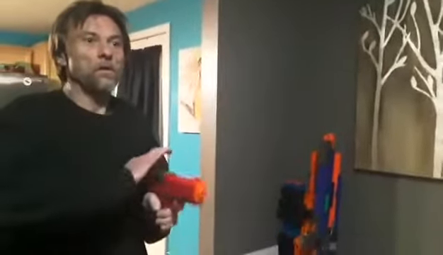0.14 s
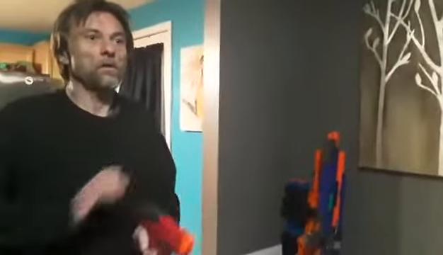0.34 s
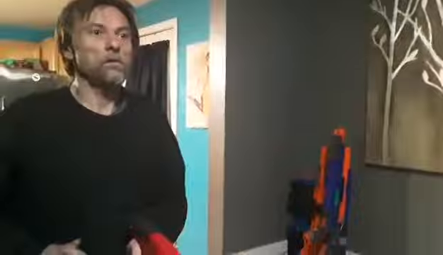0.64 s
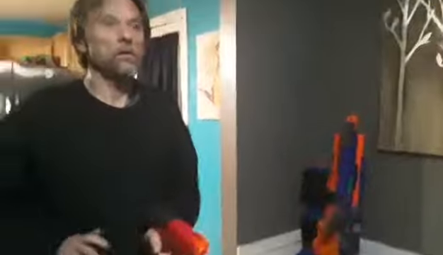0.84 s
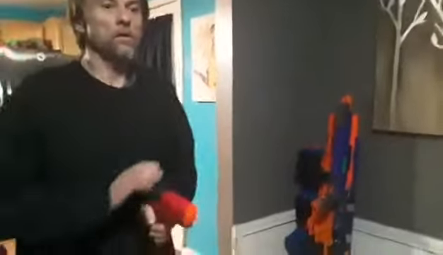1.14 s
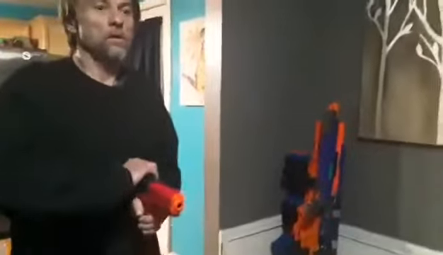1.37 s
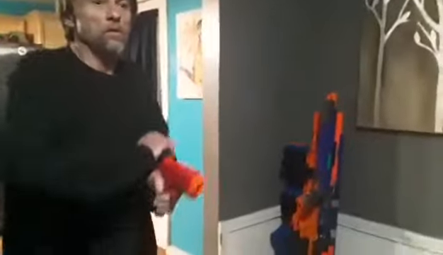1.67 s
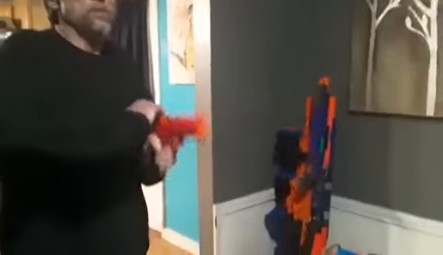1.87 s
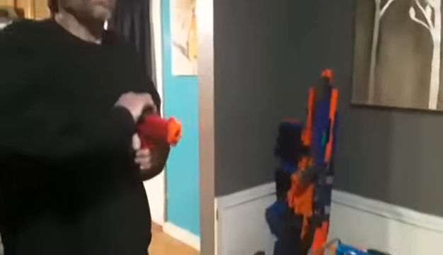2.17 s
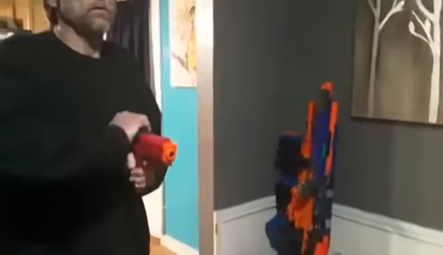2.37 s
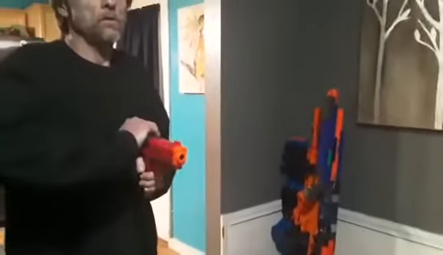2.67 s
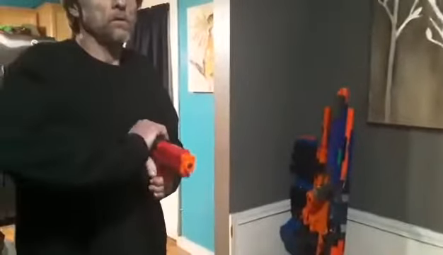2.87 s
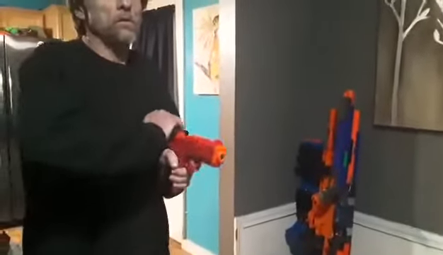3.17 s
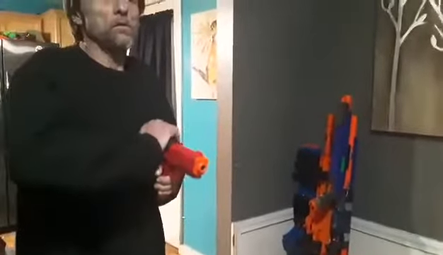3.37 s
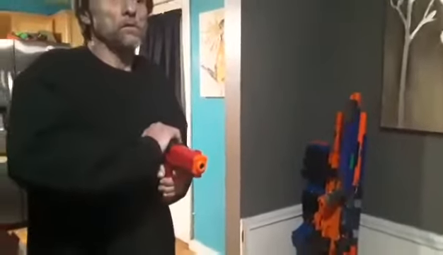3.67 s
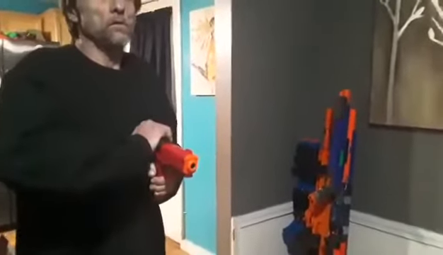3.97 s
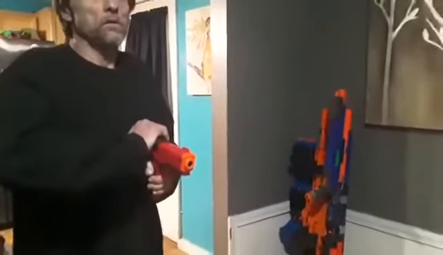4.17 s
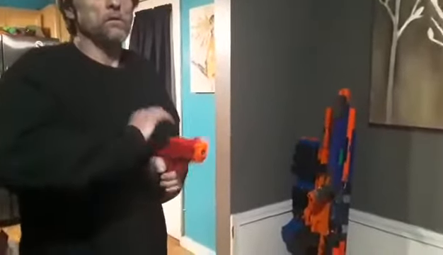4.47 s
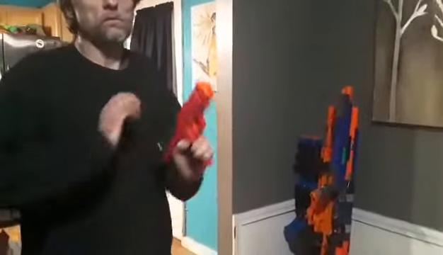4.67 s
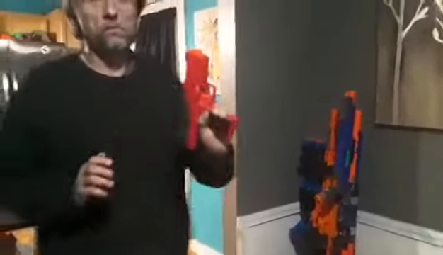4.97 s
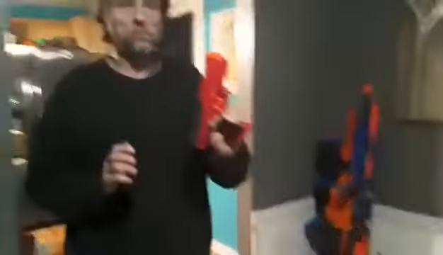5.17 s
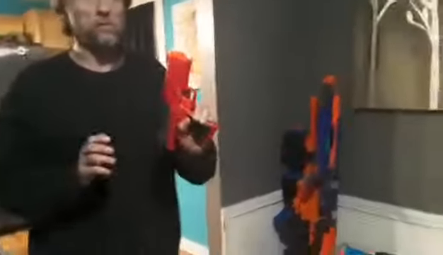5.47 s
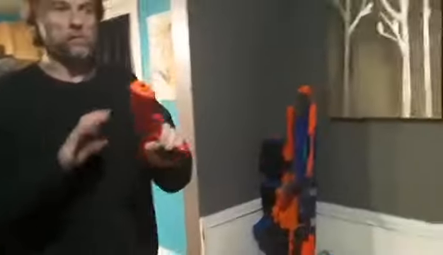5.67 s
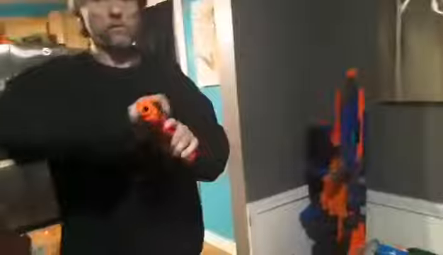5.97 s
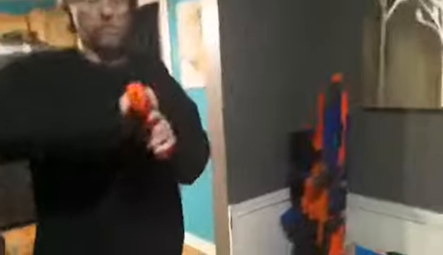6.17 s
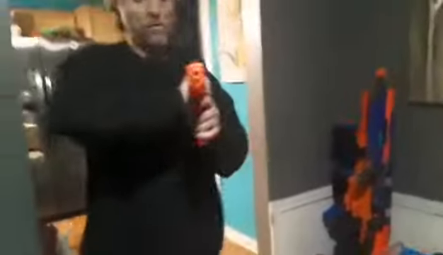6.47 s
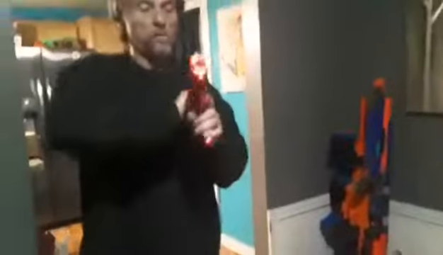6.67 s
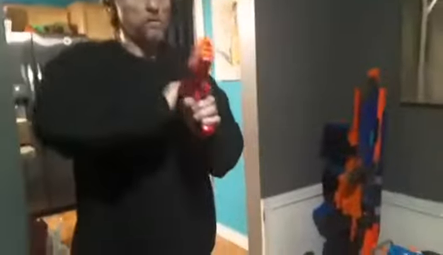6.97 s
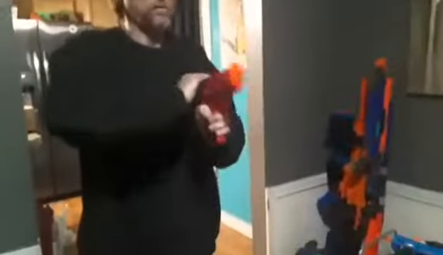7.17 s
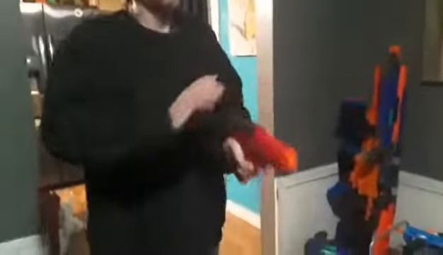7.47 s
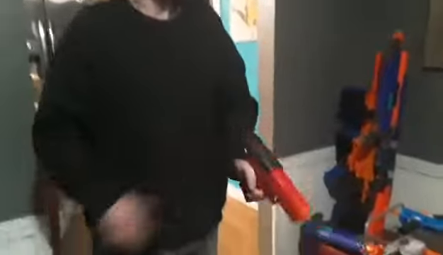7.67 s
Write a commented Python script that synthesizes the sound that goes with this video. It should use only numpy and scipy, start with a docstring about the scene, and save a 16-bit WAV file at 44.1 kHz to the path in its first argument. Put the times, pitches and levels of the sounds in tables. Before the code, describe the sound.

A spring-powered plastic dart pistol snaps and pops three times close to the microphone, its slide scraping and latching between shots. Two darts hit a hollow surface across the small room, the second with a loud slap. Later come a few dull bumps and faint ticks on the microphone and a final crisp pull and slam of the slide. A quiet low hum sinks after each shot and returns.

```python
"""A small, hard-walled room, heard through a camera's two closely spaced microphones.
Nearby, a spring-driven foam dart pistol is primed and fired three times: the plastic slide scrapes and
latches, and each shot pops, hoots in the barrel and rattles the spring. Two darts thud across the room.
Right at the microphones, small knocks and faint crackles come through the camera's own case.
Behind it all, a low hum sinks after each shot and comes back."""
import sys
import numpy as np
from scipy import signal
from scipy.fft import rfft, irfft
from scipy.io import wavfile
from scipy.ndimage import uniform_filter1d

SR = 44100
rng = np.random.default_rng(int(sys.argv[2]) if len(sys.argv) > 2 else 0)


def file_out(sig):
    """Save sig as 16-bit WAV at sys.argv[1]."""
    # one column per channel
    cols = np.atleast_2d(sig).T
    # limit, then scale
    lim = np.clip(cols, -1, 1)
    pcm = np.round(lim * 32767).astype(np.int16)
    wavfile.write(sys.argv[1], SR, pcm)


N = 344862


# The pistol's body under a shot. Each row: frequency in Hz, relative level in dB.
PISTOL_BODY = [(20, -32.5), (40, -21.5), (120, -2), (260, 2.5), (500, 1), (1000, -3), (1500, -0.5),
               (2550, -3.5), (4400, -4.5), (7000, -4), (9200, -4), (11000, -11), (12200, -26.5)]
# The barrel's odd quarter waves, a few rings of the spring, and the dips between them.
# Each row: frequency in Hz, width in Hz, height against the body in dB.
BARREL_RINGS = [(710.6, 40, 21.5), (766, 91, 13), (1290, 50, 8), (2126, 77, 17), (2220, 130, 14),
                (3040, 140, 13), (3470, 100, 14.5), (3700, 120, 14), (5000, 320, 14.5), (6000, 34, 6),
                (6430, 81, 8.5), (2430, 61, -7), (4235, 53, -6.5), (4820, 280, -5.5), (5300, 260, -7.5),
                (6700, 240, -9.5)]
# Shots near the microphones. Each row: start in seconds, level in dB, air pop strength in dB,
# pop decay in seconds, rebound delay in seconds, rebound against the slam in dB, tilt in dB per octave.
SHOTS = [(0.6114, -12, -8, 0.0011, 0.072, -7.5, 1.1), (2.3681, -13, -5, 0.0015, 0.056, 2.5, 1),
         (3.6796, -11.5, -7, 0.00068, 0.025, -2.5, 0.14)]

def shot(db, pop_db, pop_s, rebound_s, rebound_db, tilt_db, size=8192):
    """The plunger rushes forward and slams home, sounding the barrel; the spring chatters and rebounds."""
    t = np.arange(size) / SR
    since_slam = t - 0.0064
    rush = amp(-7) * (since_slam < 0) * np.minimum(t / 0.0016, 1)
    slam = burst(since_slam, 0.02)
    chatter = amp(-4) * (since_slam > 0) * np.exp(-np.maximum(t - rebound_s, 0) / 0.007)
    rebound = amp(rebound_db) * np.exp(-((t - rebound_s) / 0.009) ** 2)
    envelope = np.sqrt(rush ** 2 + slam ** 2 + chatter ** 2 + rebound ** 2)
    force = casing_echoes(whiten(envelope * rng.standard_normal(size)), echo_db=-7)
    sound = amp(db) * room(resonate(force, PISTOL_BODY, tilt_db, BARREL_RINGS), direct_db=-1.5)
    # the air behind the dart leaves the muzzle as one low pulse
    age = np.maximum(t - 0.0073, 0) / pop_s
    pulse = (age > 0) * (age - 1) * np.exp(-age)
    pop = signal.sosfilt(signal.butter(2, [45, 900], "bandpass", fs=SR, output="sos"), pulse)
    add(sound, 0, amp(pop_db - 3) * room(pop, direct_db=8, side_db=-5))
    return sound


# The slide drawn back. Each row: start, catch and latch in seconds, catch level in dB,
# latch level in dB, how squarely the pistol faces the microphones from 0 to 1.
PULLS = [(1.587, 1.6764, 1.825, -30.5, -32, 0), (2.882, 2.9944, 3.159, -32, -40.5, 0.05),
         (6.3, 6.409, 6.571, -13, -19, 0.83)]
START_DIRECT_DB = -7  # the click that opens a stroke is heard mostly off the walls

def pull(start, catch, latch, db, latch_db, facing, sear_s=0.033):
    """The slide breaks free, rubs back, rides over the sear and catches; then the latch snaps."""
    # facing the microphones, the pistol is brighter, more direct and louder on the right
    brighter, direct_db, side_db = 1.95 * facing, 5.5 * facing, -17 * facing
    rub_tilt, click_tilt = brighter - 0.46, brighter + 1
    sear = catch - sear_s
    return [(start, clack(db - 13, click_tilt, START_DIRECT_DB + direct_db, side_db)),
            (start, rub(sear - start, db - 24.5, db - 24.5, rub_tilt)),
            (sear, clack(db - 6.5, rub_tilt, START_DIRECT_DB + direct_db, side_db)),
            (sear, rub(sear_s, db - 20, db - 20, rub_tilt)),
            *hard_stop(catch, db, rub_tilt, direct_db=2.5, side_db=0.4 * side_db),
            (latch, clack(latch_db, click_tilt + brighter, direct_db, side_db))]


# The slide pushed home. Each row: start and stop in seconds, levels of first click, rub and stop in dB,
# tilt in dB per octave, directness in dB, left over right in dB.
PUSHES = [(0.008, 0.0534, -22, -21.5, -9, 0.7, 2, 1.5), (1.923, 1.956, -43.5, -28, -12.5, 0, 1.5, 2),
          (3.25, 3.284, -30, -39.5, -31.5, -0.5, 6, 4), (7.152, 7.196, -14.5, -18.5, -12.5, 0.5, 4.5, -4)]

def push(start, stop, click_db, rub_db, stop_db, tilt_db, direct_db, side_db, ridge_s=0.017):
    """The slide clicks loose, rubs louder as it gathers speed, bumps over a ridge and slams home."""
    click_tilt, rub_tilt = tilt_db + 3.3, tilt_db + 1.2
    return [(start, clack(click_db, click_tilt, START_DIRECT_DB, side_db)),
            (start, rub(stop - start, rub_db - 10.5, rub_db, rub_tilt)),
            (start + ridge_s, clack(rub_db - 0.5, click_tilt, direct_db, side_db)),
            *hard_stop(stop, stop_db, tilt_db, direct_db, side_db)]


def hard_stop(start, db, tilt_db, direct_db, side_db, bounce_s=0.0045):
    """The slide hits a stop, bounces once and sets the spring singing."""
    return [(start, clack(db, tilt_db, direct_db, side_db)),
            (start + bounce_s, clack(db - 3, tilt_db, direct_db, side_db)),
            (start, spring_twang(db - 41))]


def spring_twang(db, hz=4200, spread_hz=225, t60=1.05, size=32768):
    """A cluster of close coil modes that outlasts the room."""
    t = np.arange(size) / SR
    modes_hz = hz + spread_hz * rng.standard_normal((2, 14, 1))
    coils = np.sin(2 * np.pi * (modes_hz * t + rng.random((2, 14, 1)))).sum(1)
    return amp(db - 60 * t / t60) * unit_rms(coils) * np.minimum(t / 0.004, 1)


# The pistol's plastic shell. Each row: frequency in Hz, relative level in dB.
SHELL = [(88, -43), (150, -20), (350, -5), (385, -5.5), (664, -10), (832, 0), (949, -5), (1080, -1.5),
         (1580, -3.5), (1700, -3.5), (4120, -4.5), (5790, -9.5), (6240, -12), (11800, -18), (13500, -27.5)]

def clack(db, tilt_db, direct_db, side_db, size=1024):
    """One hard contact rings the shell, and the loose parts rattle briefly."""
    t = np.arange(size) / SR
    rattle = rng.standard_normal(size) * (rng.random(size) < 700 / SR) * burst(t, 0.011)
    contact = rng.standard_normal(size) * burst(t, 0.0028)
    force = casing_echoes(contact + amp(4) * rattle, echo_db=-2.5)
    sound = room(resonate(force, SHELL, tilt_db), direct_db - 6, side_db)
    # the edge of the catch sends a bright snap straight to the microphones
    snap = np.diff(rng.standard_normal((2, size + 1))) * burst(t - 0.0004, 0.0006)
    add(sound, 0, amp(direct_db + tilt_db - 8) * pan(side_db) * snap)
    return amp(db) * sound


def rub(length, first_db, last_db, tilt_db, slips_per_s=1500, size=16384):
    """Plastic sticks and slips on plastic: dense small clicks into the shell."""
    t = np.arange(size) / SR
    slips = rng.uniform(-1, 1, size) * (rng.random(size) < slips_per_s / SR)
    grain = unit_rms(unit_rms(slips) + 0.5 * rng.standard_normal(size))
    envelope = amp(np.interp(t, [0, length], [first_db, last_db])) * np.minimum(t / 0.004, 1)
    force = casing_echoes(grain * envelope * (t < length), echo_db=-5)
    return room(resonate(force, SHELL, tilt_db), direct_db=-2.5, side_db=-3.5)


def casing_echoes(force, echo_db, size=256):
    """Quick echoes inside the pistol comb the treble, differently each time."""
    echoes = rng.standard_normal(size) * burst(np.arange(size) / SR, 0.0016)
    echoes = highpass(echoes, hz=4000)
    taps = np.r_[1, amp(echo_db) * echoes / np.linalg.norm(echoes)]
    return signal.fftconvolve(force, taps / np.linalg.norm(taps))


# The slide starting to move. Each row: start and length in seconds, pitch in Hz, level in dB.
SQUEAKS = [(6.302, 0.034, 1330, -41), (7.14, 0.0082, 1160, -45.5)]

def squeak(length, hz, db, size=4096):
    """For a moment the slips fall into step and give a rough tone."""
    t = np.arange(size) / SR
    waver = unit_rms(uniform_filter1d(rng.standard_normal(size), 60))
    tone = np.sin(2 * np.pi * np.cumsum(hz * (1 + 0.026 * waver)) / SR)
    return room(amp(db) * tone * np.sin(np.pi * np.minimum(t / length, 1)), direct_db=6)


# A hand on the pistol. Each row: start and end in seconds, final level in dB.
GRIPS = [(0.456, 0.636, -53.5), (2.201, 2.348, -50), (5.098, 5.147, -55.5), (6.017, 6.133, -58),
         (7.002, 7.101, -53.5)]

def grip(length, db):
    """The shell creaks louder as the grip tightens."""
    return rub(length, db - 13.5, db, tilt_db=-0.8)


# Handling, just right of centre. Each row: start in seconds, level in dB, tilt in dB per octave,
# directness in dB.
LOOSE_CLICKS = [(0.908, -41, -1, 1), (1.174, -49, -1.5, -1), (2.115, -30, -5, 0), (3.632, -44, 0, 0.5),
                (7.508, -46.5, 4.5, 4.5)]

def loose_click(db, tilt_db, direct_db):
    """A loose part clicks against the shell."""
    return clack(db, tilt_db, direct_db, side_db=-2.5)


# The panel the darts hit. Each row: frequency in Hz, relative level in dB.
PANEL = [(20, -34), (50, -26), (110, -11), (260, 7), (420, 5), (750, 2.5), (1150, 0.5), (1700, -6.5),
         (4000, -7.5), (7000, -18.5), (10000, -27.5), (13000, -49)]
# Its resonances. Each row: frequency in Hz, width in Hz, height in dB before a dart's offset.
PANEL_RINGS = [(268, 24, 11), (378, 35, 11), (590, 86, 12.5), (4470, 1300, 2)]
# Darts landing across the room, heard mostly off the walls. Each row: start in seconds,
# slap level in dB, tilt in dB per octave, resonance offset in dB, thud level in dB.
DARTS = [(2.622, -25.5, 0, -9.5, -14), (3.8805, -7.5, 1.5, -2.5, -18)]

def dart(db, tilt_db, ring_db, thud_db, size=4096):
    """A foam dart strikes a hollow panel: a slap that rings it, and a dull thud."""
    t = np.arange(size) / SR
    force = whiten(rng.standard_normal(size) * burst(t, 0.007))
    rings = [(hz, width, height_db + ring_db) for hz, width, height_db in PANEL_RINGS]
    sound = amp(db) * resonate(force, PANEL, tilt_db, rings)
    thud = np.sin(2 * np.pi * 330 * t) * burst(t, 0.0029)
    sound[:size] += amp(thud_db) * highpass(thud, hz=85)
    return room(sound, direct_db=-11.5)


# The camera's case. Each row: frequency in Hz, relative level in dB.
CAMERA_CASE = [(40, -31), (200, 5.5), (700, -1), (1500, 3), (2500, -4), (6000, -13), (13000, -24.5)]
# Knocks right at the microphones. Each row: start in seconds, thump level in dB, thump pitch in Hz,
# tick level in dB, tick tilt in dB per octave, left over right in dB.
KNOCKS = [(5.173, -16, 230, -22, -3, 36), (5.2333, -59, 300, -42.5, 6, 22), (5.699, -62, 300, -44, 2, 9),
          (5.763, -55, 250, -39, -1, 23), (6.137, -22, 174, -29, -1, -18),
          (6.187, -27, 207, -33.5, -0.5, 26), (6.612, -27, 523, -31, -4.5, -17)]

def knock(thump_db, hz, tick_db, tilt_db, side_db, size=2048):
    """A dry tick and a dead thump, carried through the camera's case."""
    t = np.arange(size) / SR
    thump = -amp(thump_db) * np.sin(2 * np.pi * hz * t) * burst(t, 0.0031)
    force = rng.standard_normal(size) * burst(t, 0.002)
    tick = amp(tick_db) * resonate(force, CAMERA_CASE, tilt_db)[:size]
    return pan(side_db) * (highpass(thump, hz=117) + tick)


def case_crackle(start, end, ticks_per_s=19, count=60):
    """The camera's case gives tiny dry ticks as it is moved, at random times and sides."""
    gap, strength, side = rng.random((count, 3)).T
    times = start + np.cumsum(-np.log(1 - gap)) / ticks_per_s
    levels_db = -55.5 + 3 * np.minimum(-np.log(1 - strength), 2)
    sides_db = 20 * (side - 0.5)
    forces = rng.standard_normal((count, 256)) * burst(np.arange(256) / SR, 0.00069)
    return [(s, amp(db) * pan(side_db) * resonate(force, CAMERA_CASE, tilt_db=2.9, size=1024))
            for s, db, side_db, force in zip(times, levels_db, sides_db, forces) if s < end]


# The background hum, alike in both microphones. Each row: frequency in Hz, relative level in dB.
HUM_TONES = [(150.7, -64), (177.6, -69.5), (204.6, -58), (360.7, -62), (393.0, -60.5), (436.0, -63.5)]
# The soft rush around it. Each row: frequency in Hz, relative level in dB.
HUM_RUSH = [(15, -60), (25, -36), (86, -15), (138, -8), (211, -2.5), (260, -6.5), (330, -10), (357, -4),
            (727, -16.5), (1140, -17), (1980, -22), (4020, -26.5), (7180, -35.5), (12200, -38),
            (13500, -46.5)]

def hum(waver_hz=3):
    """Wavering low tones in a soft rush, swelling and sinking together; the bass sinks furthest."""
    t, hz = np.arange(N) / SR, np.fft.rfftfreq(2048, 1 / SR)
    real, imaginary = rng.standard_normal((2, 2, len(hz), N // 512 + 5))
    spectra = microphone_pair(real + 1j * imaginary, hz) * amp(curve(HUM_RUSH, hz))[:, None]
    rush = unit_rms(signal.istft(spectra, nperseg=2048, noverlap=1536)[1][:, :N])
    knots = np.linspace(0, N / SR, num=80)
    tones = np.zeros(N)
    for tone_hz, db in HUM_TONES:
        waver = waver_hz * np.interp(t, knots, rng.standard_normal(len(knots)))
        tones += amp(db) * np.sin(2 * np.pi * np.cumsum(tone_hz + waver) / SR)
    sound = amp(-1.5) * rush + amp(-4.5) * unit_rms(tones)
    bass = signal.sosfiltfilt(signal.butter(3, 170, fs=SR, output="sos"), sound)
    level_db = -52 + hum_dip_db(t)
    bass_gain = amp(0.74 * (level_db + 56.5))
    return amp(level_db) * (sound - bass + bass * bass_gain)


def hum_dip_db(t, sink_s=0.52, hold_s=0.623, return_s=0.45):
    """The hum dips deeply after a shot and a little after the slide slams home."""
    corners = np.cumsum([0, sink_s, hold_s, return_s])
    dips = [(start, -16) for start, *_ in SHOTS] + [(stop, -4) for _, stop, *_ in PUSHES]
    return np.min([np.interp(t - s, corners, [0, db, db, 0]) for s, db in dips], axis=0)


# The small room's decay. Each row: frequency in Hz, time to fall 60 dB in seconds.
ROOM_T60 = [(100, 0.091), (300, 0.32), (1000, 0.29), (2700, 0.33), (7000, 0.3), (13000, 0.16)]

def room(source, direct_db, side_db=0, size=20480):
    """Direct sound, a few wall slaps and a dense tail that lasts longest in the middle range."""
    t = np.arange(size) / SR
    slaps = rng.standard_normal((2, size)) * (rng.random((2, size)) < 300 / SR) * burst(t, 0.0086)
    taps = (rng.standard_normal((2, size)) + 10 * slaps) * np.clip((t - 0.002) / 0.003, 0, 1)
    hz, when, spectra = signal.stft(taps, SR, nperseg=256)
    decay = amp(-60 * when / curve(ROOM_T60, hz)[:, None])
    left, right = signal.istft(microphone_pair(spectra, hz) * decay, SR, nperseg=256)[1]
    middle, side = whiten(left + right), left - right
    response = np.array([middle + side, middle - side])
    response /= np.linalg.norm(response, axis=1, keepdims=True)
    # the direct sound reaches the right microphone one sample sooner
    response[[0, 1], [1, 0]] += amp(direct_db) * pan(side_db)[:, 0]
    return signal.fftconvolve(source[None], response, axes=1)


# Diffuse sound at the two microphones. Each row: frequency in Hz, left-right correlation.
MIC_LIKENESS = [(100, 0.78), (300, 1), (600, 0.61), (1200, 0.18), (4000, -0.056)]

def microphone_pair(spectra, hz):
    """Makes two unrelated spectra alike in the bass, as two close microphones hear them."""
    likeness = curve(MIC_LIKENESS, hz)[:, None]
    return np.array([spectra[0], likeness * spectra[0] + np.sqrt(1 - likeness ** 2) * spectra[1]])


def resonate(force, spectrum, tilt_db, rings=(), size=8192):
    """Passes a force through a body of unit energy: a broad spectrum with resonances and dips."""
    hz = np.fft.rfftfreq(size, 1 / SR)
    peak_power, dips_db = 1, 0
    for centre, width, db in rings:
        bell = 1 / (1 + (2 * (hz - centre) / width) ** 2)
        peak_power += (db > 0) * amp(db) ** 2 * bell
        dips_db += min(db, 0) * bell
    shape_db = curve(spectrum, hz) + dips_db + tilt_db * np.log2(np.maximum(hz, 150))
    response = minimum_phase(np.sqrt(peak_power) * amp(shape_db))
    return signal.fftconvolve(force, response / np.linalg.norm(response))


def whiten(x, size=32768):
    """Irons the chance peaks out of a burst's bass and middle, so a body's own low rings stand clear."""
    power = uniform_filter1d(abs(rfft(x, size)) ** 2, 45)
    share = 1 / (1 + (np.fft.rfftfreq(size, 1 / SR) / 2800) ** 4)
    gain = (power.mean() / (power + power.mean() / 1000)) ** (share / 2)
    return signal.fftconvolve(x, minimum_phase(gain))[:len(x)]


def minimum_phase(gain):
    """The shortest causal response with the given gains."""
    cepstrum = irfft(np.log(gain))
    half = len(cepstrum) // 2
    cepstrum[1:half] *= 2
    cepstrum[half + 1:] = 0
    return irfft(np.exp(rfft(cepstrum)))


def highpass(x, hz):
    """Takes away the bass below hz."""
    return signal.sosfilt(signal.butter(2, hz, "highpass", fs=SR, output="sos"), x)


def burst(t, fade_s):
    """A sudden start at t = 0 that dies away exponentially."""
    return (t >= 0) * np.exp(-np.maximum(t, 0) / fade_s)


def curve(points, hz):
    """Joins (Hz, value) points by straight lines over log frequency."""
    point_hz, values = np.transpose(points)
    return np.interp(np.log(hz + 1), np.log(point_hz + 1), values)


def amp(db):
    """Decibels to gain."""
    return 10 ** (np.asarray(db) / 20)


def unit_rms(x):
    """Scales to an rms of one."""
    return x / np.sqrt(np.mean(x ** 2) + 1e-20)


def pan(side_db):
    """Gains for a left-over-right level difference, at constant power."""
    return unit_rms(amp(np.array([[side_db], [-side_db]]) / 2))


def add(mix, start, sound):
    """Lays a stereo sound into the mix at a start in seconds."""
    part = mix[:, max(round(start * SR), 0):][:, :sound.shape[1]]
    part += sound[:, :part.shape[1]]


def scene():
    """The pistol nearby, the darts across the room and the camera's own noises, over the hum."""
    mix = hum()
    for stroke, table in ((pull, PULLS), (push, PUSHES)):
        for row in table:
            for start, sound in stroke(*row):
                add(mix, start, sound)
    for start, end, db in GRIPS:
        add(mix, start, grip(end - start, db))
    for source, table in ((loose_click, LOOSE_CLICKS), (shot, SHOTS), (squeak, SQUEAKS),
                          (dart, DARTS), (knock, KNOCKS)):
        for start, *settings in table:
            add(mix, start, source(*settings))
    for start, sound in case_crackle(start=5.05, end=7.1):
        add(mix, start, sound)
    return mix


# The balance of the two microphones. Each row: frequency in Hz, left over right in dB.
MIC_BALANCE = [(60, -1.5), (250, -1), (1000, -0.5), (2500, -0.5), (5000, -2), (8500, -6), (12000, -5)]
CEILING, BAND_LIMIT_HZ = 0.92, 13350

def record(dry):
    """The right microphone is the brighter and louder; peaks are rounded off and the top treble is cut."""
    side_db = curve(MIC_BALANCE, np.fft.rfftfreq(N, 1 / SR))
    heard = irfft(rfft(dry) * amp(np.array([side_db, -side_db]) / 2), N)
    rounded = CEILING * np.tanh(heard / CEILING)
    lowpass = signal.firwin(255, BAND_LIMIT_HZ, window=("kaiser", 9), fs=SR)
    return signal.oaconvolve(rounded, lowpass[None], "same")


dry = scene()
out = record(dry)
file_out(out)
```